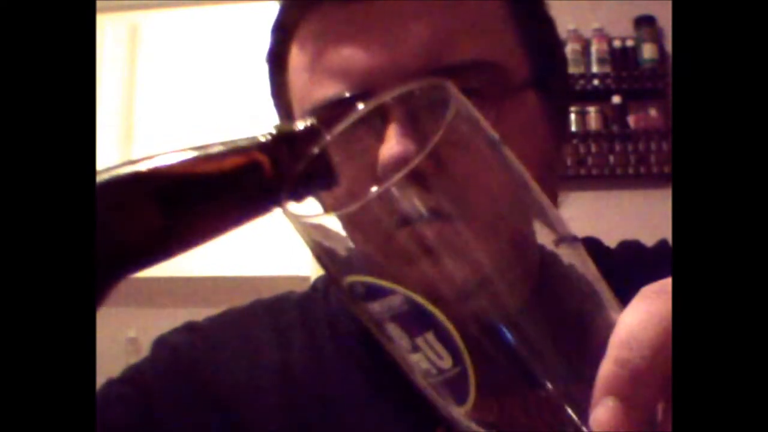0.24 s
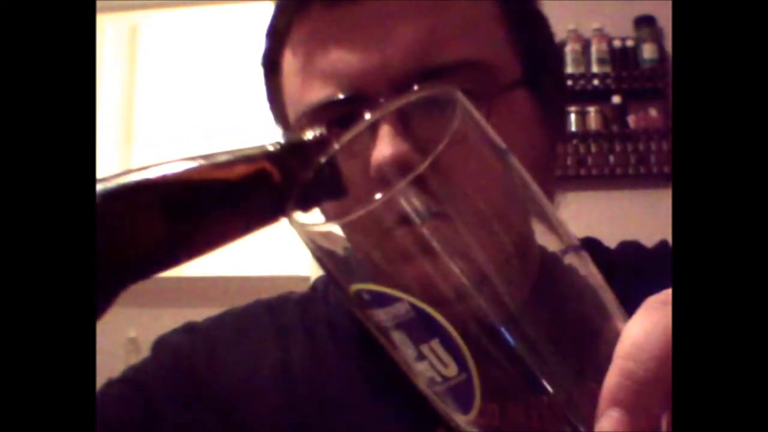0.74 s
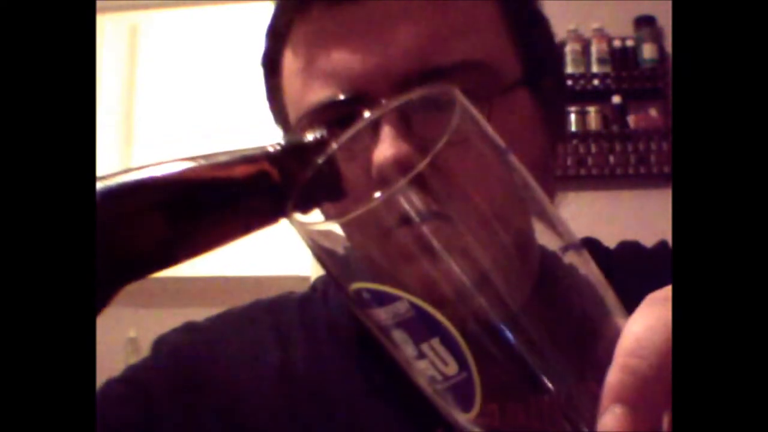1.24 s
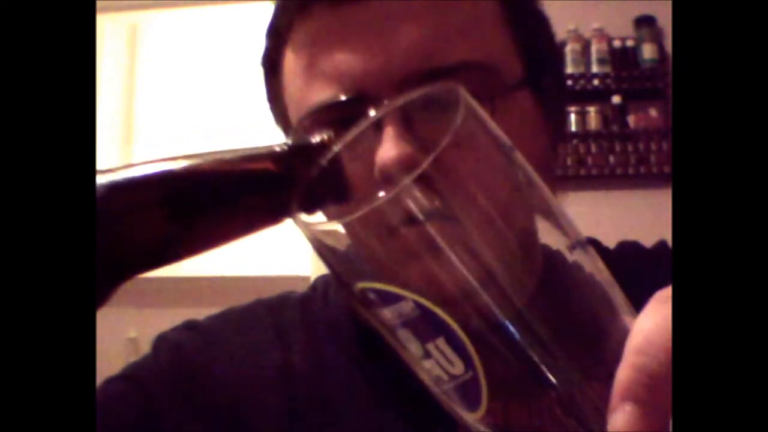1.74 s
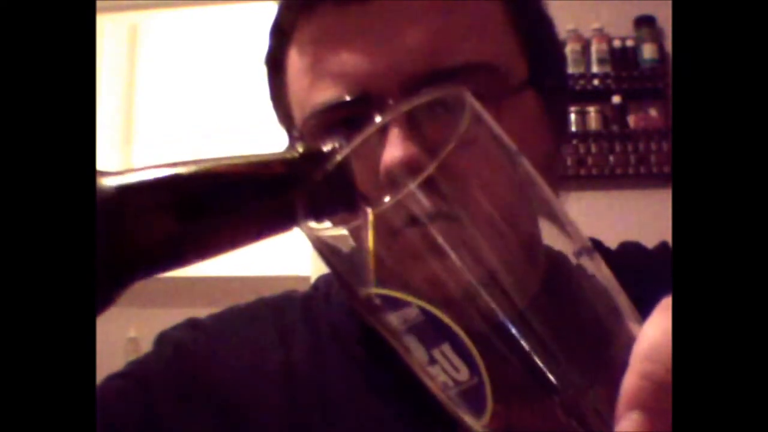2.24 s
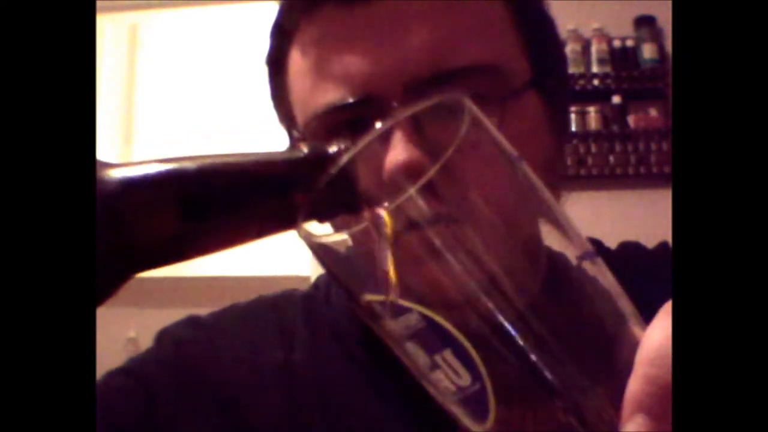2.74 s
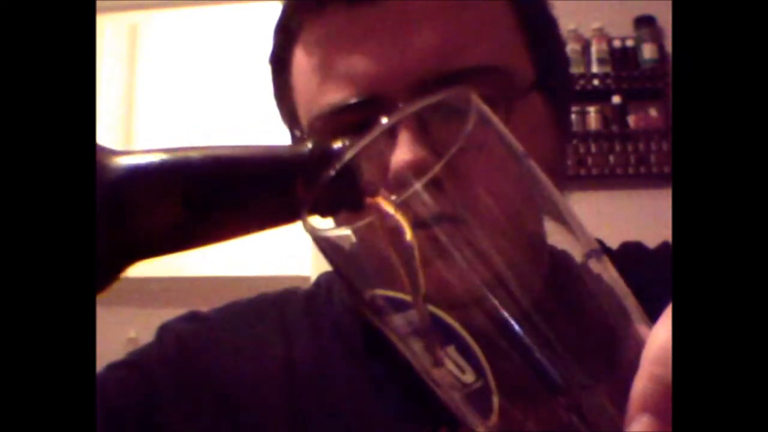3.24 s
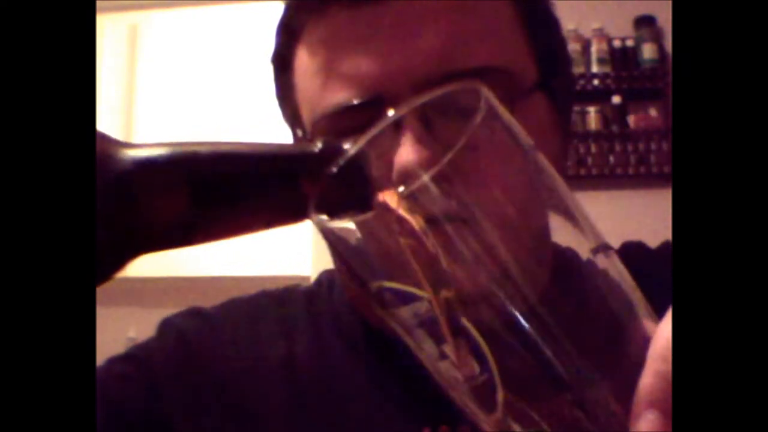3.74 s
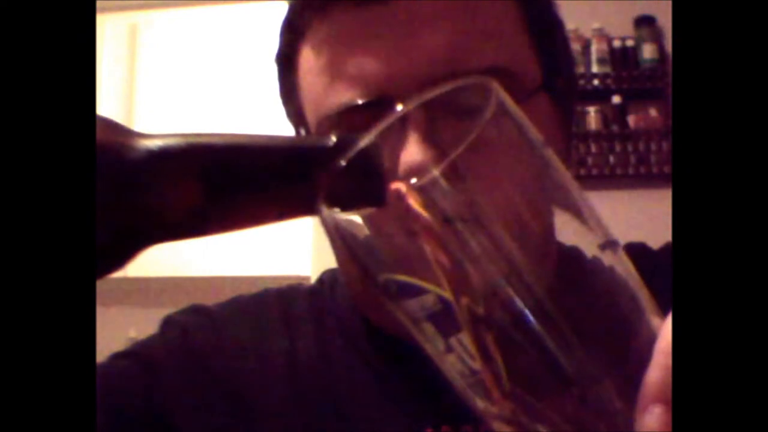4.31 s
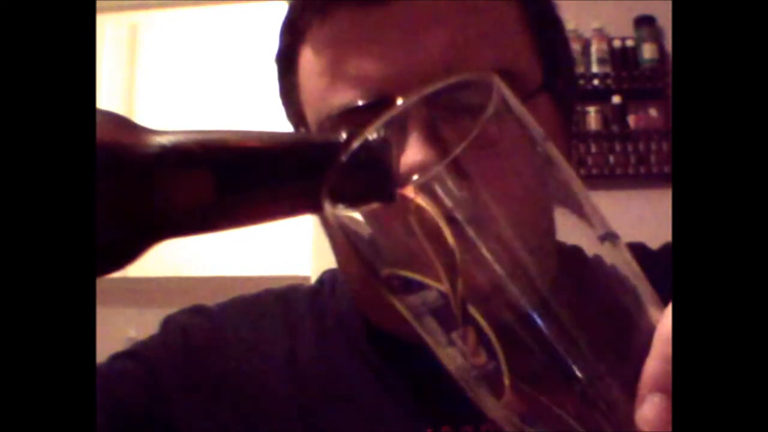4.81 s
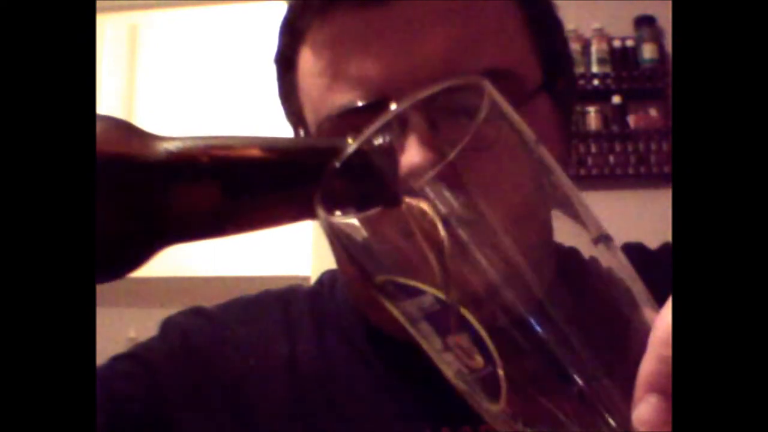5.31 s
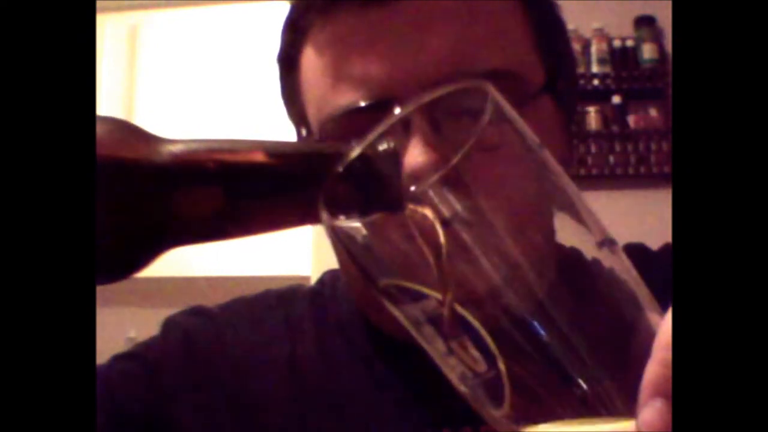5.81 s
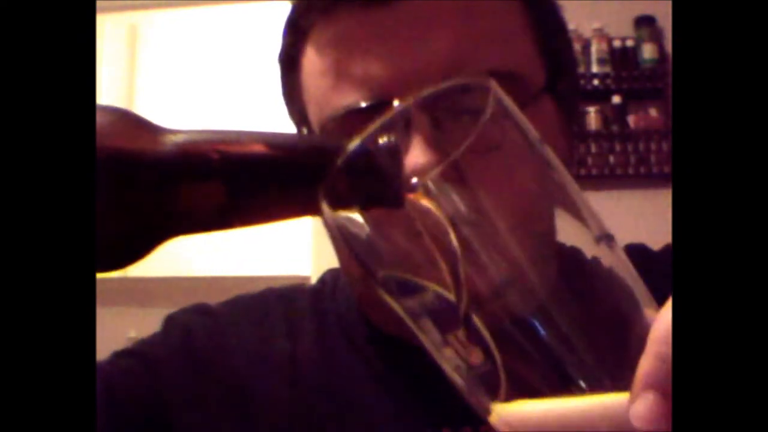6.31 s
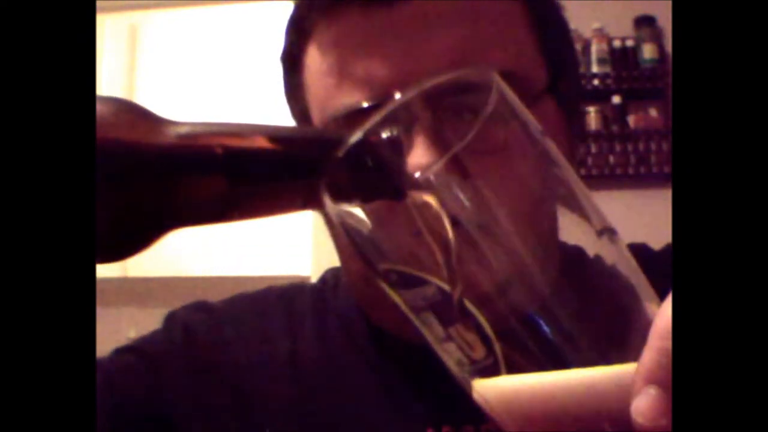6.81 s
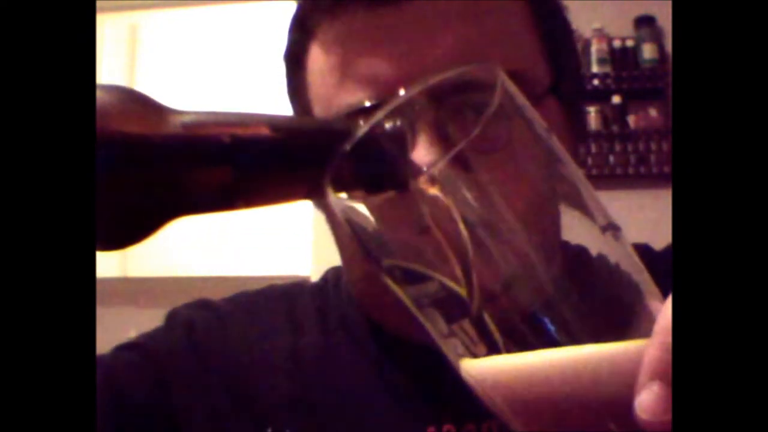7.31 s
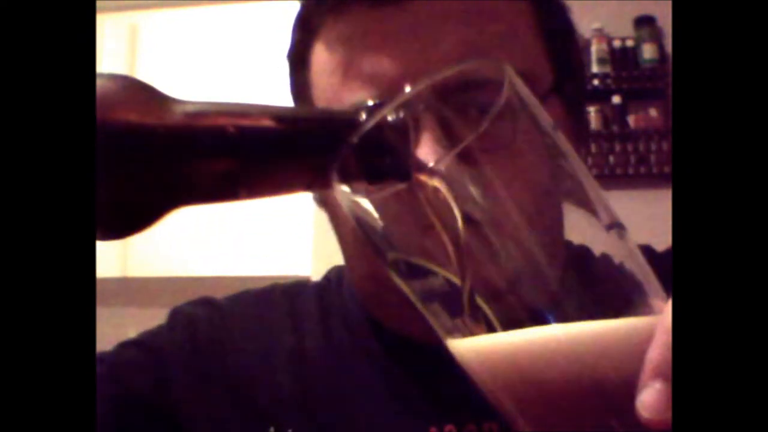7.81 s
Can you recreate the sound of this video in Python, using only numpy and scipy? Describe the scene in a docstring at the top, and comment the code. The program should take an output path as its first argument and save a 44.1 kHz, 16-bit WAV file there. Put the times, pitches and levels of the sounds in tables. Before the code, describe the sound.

Constant broadband hiss, cut off in the high treble, with barely audible thin electronic tones, runs for the whole eight seconds in a small room. The first second is hiss alone. At about 1.1 s a bottle neck chatters lightly and rapidly on a glass rim, with a single clearer clink at 1.45 s and a faint tap at 1.9 s. The loudest clinks come at 2.13 to 2.26 s, a quick bouncing rattle whose bright ring beats and fades over about a second. A soft, dull handling bump swells at 3.2 s. More rattling taps come at 4.1 to 4.4 s and 4.64 to 4.8 s, with a slightly higher hollow glass note. Weak, drier ticks follow from 6.2 to 6.9 s, then only hiss to the end. No pouring is audible.

```python
"""Beer is poured inaudibly into a tilted pint glass, close to a hissy webcam in a small room: filtered noise and thin
tones run throughout. From 1.1 s the bottle neck chatters on the rim, most loudly near 2.13 s; a soft handling bump
swells at 3.2 s; more chatter follows from 4.1 to 4.7 s and from 6.2 to 6.9 s. Each touch knocks, sounds the air in the
glass at a pitch that climbs with the filling, and resets the swing of the glass's modes. In a run the lowest mode
weakens, usually as the next one gains; the modes ring on and beat after the last touch."""
import sys
import numpy as np
from scipy import signal
from scipy.fft import rfft, irfft, next_fast_len
from scipy.io import wavfile

SR = 44100
rng = np.random.default_rng(int(sys.argv[2]) if len(sys.argv) > 2 else 0)


def to_wav(s):
    """Save 16-bit WAV."""
    ch = np.atleast_2d(s).T  # columns
    pcm = np.round(np.clip(ch, -1, 1) * 32767)  # PCM
    wavfile.write(sys.argv[1], SR, pcm.astype(np.int16))


N = 355093
TIME = np.arange(N) / SR  # s

# Spectrum of the microphone hiss. Each row: frequency in Hz, relative density in dB per Hz.
HISS_SPECTRUM = [(15, -21), (25, -3), (33, -8.5), (64, -9), (151, -8.5), (179, -8), (207, -8), (284, -7.5),
                 (749, -7.5), (979, -8), (1670, -9.5), (7000, -9), (7720, -10.5), (8300, -41.5),
                 (10800, -62.5), (18300, -120)]
# Spectrum of the hiss that is opposite in the two channels. Each row: frequency in Hz, relative density in dB per Hz.
SIDE_SPECTRUM = [(3000, -73.5), (4000, -26), (6000, -9.5), (7400, -62.0), (8300, 11.0)]
# Faint hum and electronic whine. Each row: frequency in Hz, rms level in dB.
WHINE_TONES = [(177.6, -67), (1001, -63), (2003, -64.5), (3499, -76.5), (5502, -82.5), (6498, -62.5)]
# The soft handling bump. One row: centre in seconds, standard deviation of the swell in seconds, level in dB.
HANDLING_BUMP = (3.2, 0.044, -45.5)
# Spectrum of the bump. Each row: frequency in Hz, relative density in dB per Hz.
BUMP_SPECTRUM = [(60, -17), (150, 4), (600, -7), (1500, -9), (5000, -33)]
# Resonances as the glass fills. Each row: time in seconds, air column in Hz, its level in dB relative to the knock,
# upper resonance in Hz, its level in dB relative to the knock.
FILLING = [(1.4, 522.5, -11.5, 3580, -15.5), (2.2, 525, -18.5, 3650, -16.5), (4.15, 586, -23, 3735, -20.5),
           (4.72, 619, -22.5, 3860, -22), (6.6, 630, -26.5, 4040, -33)]
# Spectrum of the dense overtones of the glass. Each row: frequency in Hz, relative density in dB per Hz.
SHIMMER_SPECTRUM = [(300, -13.5), (1000, 2.5), (1600, 8), (2300, -13), (3000, -14.5), (3600, 6),
                    (5400, -0.5), (6200, 2), (8000, -21)]
# Spectrum of the dry knock. Each row: frequency in Hz, relative density in dB per Hz.
KNOCK_SPECTRUM = [(100, -38), (400, -36.5), (750, -12), (1050, -7), (1350, 0.5), (1650, -6), (1900, 6.5),
                  (2200, 1), (2700, -13), (4000, -12), (5500, -23), (8000, -27)]
# Lesser modes of glass and bottle. Each row: frequency in Hz, relative level in dB, 60 dB decay time in seconds.
LESSER_MODES = [(1211, -20, .12), (1420, -23, .025), (1860, -24, .1), (1957, -23, .12), (2052, -26, .12),
                (2168, -27, .12), (2617, -29, .1), (2848, -31, .12), (2880, -31, .18), (4545, -28, .1),
                (4683, -25, .22), (4996, -25, .18), (5330, -25, .08), (5388, -24, .12), (6835, -36, .15),
                (7470, -34, .12)]
# The low, middle and high ring, each a close pair of modes. Each row: frequency in Hz, relative level in dB,
# 60 dB decay time in seconds before extra damping, level of the weaker twin in dB relative to the stronger,
# splitting as a share of the beat rate.
RING_PAIRS = [(1109.3, -1.5, 1.15, -19.5, .5), (2520.7, 1, 0.95, -3.5, 1.0), (3349, 1, .22, -31.5, 0.6)]
# Landings of the neck on the rim. Each row: start in seconds, number of touches, first bounce in seconds,
# later bounces in seconds, relative level of the first knock in dB, low ring at first and at last touch in relative dB,
# middle ring at first and at last touch in relative dB, high ring at first touch in relative dB; then, after the
# last touch: beat rate in Hz, wait before the beat in seconds, extra damping in dB per second.
RIM_LANDINGS = [(1.12, 2, 0.021, .011, -19.5, -17, -30.5, -31, -30.5, -30, 10, .02, -5),
                (1.1634, 5, 0.0061, 0.012, -22, -18, -32.5, -32, -21, -29, 8, 0.094, -8),
                (1.451, 1, 0, 0, -14.5, -14.5, -15.5, -20.5, -22.5, -24.5, 10.2, 0, 1.5),
                (1.891, 1, 0, 0, -32, -29, -28, -40.5, -41.5, -53, 11.6, 0, 4.5),
                (2.1288, 2, 0.028, .011, -10, -10, -14, -21.5, -19, -22, 12, 0.054, -3),
                (2.1797, 4, .0106, 0.013, -14, -14.5, -28.5, -15, -18, -25.5, 12, 0.021, -1),
                (2.2426, 2, 0.021, .011, -24.5, -22.5, -29, -17.5, -17.5, -33, 12.37, 0.015, 0.5),
                (4.1097, 4, 0.021, 0.015, -18.5, -18.5, -30, -55, -21, -39.5, 10.7, 0.013, 4),
                (4.2869, 4, 0.013, .0145, -25.5, -23, -50, -41.5, -34, -46, 9.1, 0.25, 33),
                (4.6382, 10, .0226, .012, -14.5, -15, -46.5, -32, -16.5, -30.5, 9.4, 0.037, 16),
                (6.1752, 3, 0.015, 0.015, -22.5, -23, -38.5, -34, -36, -35.5, 17, 0, 189),
                (6.5236, 7, 0.0097, 0.013, -25, -46, -64, -26.5, -29.5, -37, 19, 0.11, 9),
                (6.742, 3, 0.023, 0.0062, -29.5, -47, -52, -34.5, -39.5, -47, 11, 0, 120),
                (6.882, 1, 0, 0, -37, -56, -57, -36, -36.5, -61, 11.6, 0.0084, 13)]


def from_db(db):
    """Principle of the logarithmic level: decibels become an amplitude ratio."""
    return 10 ** (np.asarray(db) / 20)


def rms_one(x):
    """Normalisation by mean power: the signal is scaled to unit rms."""
    return x / np.sqrt(np.mean(x ** 2) + 1e-20)


def read(table, seconds):
    """Linear interpolation: the columns of a table at the given moments."""
    times, *columns = np.transpose(table)
    return [np.interp(seconds, times, column) for column in columns]


def gain_curve(spectrum, size):
    """Spectral envelope: levels joined along log frequency, as gains on an FFT grid."""
    hz, db = np.transpose(spectrum)
    grid_hz = np.fft.rfftfreq(size, 1 / SR) + 1  # one hertz added keeps the logarithm finite
    return from_db(np.interp(np.log(grid_hz), np.log(hz), db))


def noise(spectrum):
    """Spectral shaping: white noise filtered to the given colour, at unit rms."""
    size = next_fast_len(N, True)
    white = rfft(rng.standard_normal(size))
    return rms_one(irfft(white * gain_curve(spectrum, size), size)[:N])


def snap(spectrum, size=2048):
    """Minimum phase: folding the cepstrum gives a causal pulse with its energy earliest, at unit peak."""
    cepstrum = irfft(np.log(gain_curve(spectrum, size)))
    cepstrum[1:size // 2] *= 2
    cepstrum[size // 2 + 1:] = 0
    pulse = irfft(np.exp(rfft(cepstrum)))
    return pulse / np.abs(pulse).max()


def clicks(seconds, heights):
    """Impulsive excitation: one impulse at each moment."""
    return np.bincount(np.round(seconds * SR).astype(int), heights, N)


def ring(drive, hz, t60):
    """Damped harmonic oscillator: a unit click starts a decaying sine whose initial envelope is 1."""
    radius = from_db(-60 / (t60 * SR))
    angle = 2 * np.pi * hz / SR
    feedback = [1, -2 * radius * np.cos(angle), radius * radius]
    return signal.lfilter([0, np.sin(angle)], feedback, drive + 1e-18)


def electronics(hiss_db=-42.5, side_db=-15):
    """Stationary noise and steady tones: hiss common to both channels, joined near the top by an opposed part."""
    whine = np.zeros(N)
    for hz, db in WHINE_TONES:
        whine += np.sqrt(2) * from_db(db) * np.sin(2 * np.pi * (hz * TIME + rng.random()))
    common = noise(HISS_SPECTRUM)
    side = from_db(side_db) * noise(SIDE_SPECTRUM)
    return whine + from_db(hiss_db) * (common + side * [[1], [-1]])


def bump():
    """Amplitude modulation: a Gaussian swell shapes dull, low noise."""
    centre, width, db = HANDLING_BUMP
    swell = np.exp(-0.5 * ((TIME - centre) / width) ** 2)
    return from_db(db) * swell * noise(BUMP_SPECTRUM)


def room(x, t60=0.33, first_echo_s=0.0013):
    """Diffuse reverberation: convolution with decaying noise of unit energy, as from nearby walls."""
    age = TIME[:SR // 2]
    tail = rng.standard_normal(len(age)) * from_db(-60 * age / t60) * (age > first_echo_s)
    return signal.oaconvolve(x, tail / np.linalg.norm(tail))[:N]


def chatter():
    """Repeated impact: each landing is one first bounce and a run of nearly even ones with changing mode levels."""
    knock_loss_db, high_loss_db = 1.3, 2  # lost at every bounce
    settle_db = 3  # further knock loss by the end of a run, as the neck settles
    low_hold, middle_rise = 2.16, 4.4  # exponents: low ring holds then drops, middle changes early then levels off
    # chance spread of knock, timing and ring levels, between the first and last touch of a run
    uneven_db, uneven_s, ring_spread_db = 2.5, 0.0003, 2
    # Each row: time in seconds, knock, low, middle and high ring in relative dB, beat rate in Hz,
    # wait in seconds, extra damping in dB per second.
    rows = []
    for (start, count, first_s, later_s, knock, low_first, low_last,
         middle_first, middle_last, high, *ring_on) in RIM_LANDINGS:
        last = count - 1
        for k in range(count):
            progress = k / max(last, 1)
            late, hard, *ring_chance = rng.standard_normal(5) * (0 < k < last)
            bounce_s = first_s + (k - 1) * later_s if k > 0 else 0
            s = start + bounce_s + uneven_s * late
            knock_db = knock - knock_loss_db * k - settle_db * progress ** 2 + uneven_db * hard
            low_db = low_first + (low_last - low_first) * progress ** low_hold
            middle_db = middle_last + (middle_first - middle_last) * (1 - progress) ** middle_rise
            high_db = high - high_loss_db * k
            rings_db = np.array([low_db, middle_db, high_db]) + ring_spread_db * np.array(ring_chance)
            after = ring_on if k == last else (0, 0, 0)
            rows.append((s, knock_db, *rings_db, *after))
    return np.array(sorted(rows))


def air_note(touches, air_t60=0.19, upper_t60=0.12):
    """Cavity resonance: the air gives a short hollow note; it and an upper resonance climb as the beer rises."""
    out = np.zeros(N)
    age = TIME[:SR // 3]
    for s, level_db, *_ in touches:
        air_hz, air_db, upper_hz, upper_db = read(FILLING, s)
        start = round(s * SR)
        for hz, db, t60 in (air_hz, air_db, air_t60), (upper_hz, upper_db, upper_t60):
            envelope = from_db(level_db + db - 60 * age / t60)
            out[start:start + len(age)] += envelope * np.sin(2 * np.pi * hz * age)
    return out


def shimmer(touches, shimmer_db=-20.5, t60=0.2):
    """High modal density: overtones too close to tell apart add in energy as a short wash of noise."""
    s, level_db = touches.T[:2]
    energy_keep = from_db(-60 / (t60 * SR)) ** 2
    struck = clicks(s, from_db(level_db) ** 2) + 1e-18
    energy = signal.lfilter([1], [1, -energy_keep], struck)
    return from_db(shimmer_db) * np.sqrt(energy) * noise(SHIMMER_SPECTRUM)


def knocks(touches, knock_db=1.5, modes_db=0.84, scatter_db=4.0):
    """Impact excitation: each touch gives a dry tick and strikes the lesser modes a little differently."""
    s, level_db = touches.T[:2]
    out = signal.oaconvolve(clicks(s, from_db(level_db + knock_db)), snap(KNOCK_SPECTRUM))[:N]
    chance = rng.standard_normal((len(s), len(LESSER_MODES))).T
    for (hz, db, t60), luck in zip(LESSER_MODES, chance):
        heights = from_db(level_db + db + modes_db + scatter_db * luck)
        out += ring(clicks(s, heights), hz, t60)
    return out


def glass_rings(touches, jolt_rad=0.89, contact_s=0.00091):
    """Split modes: each touch resets a pair's swing and jolts its phase; the pair then decays, and may beat."""
    s, _, *levels = touches.T[:-3]
    last = np.maximum(np.searchsorted(s, TIME, side="right") - 1, 0)  # latest touch at each sample
    age = np.maximum(TIME - s[last], 0)
    beat_hz, wait, damping = touches.T[-3:, last]
    beats = beat_hz * np.maximum(age - wait, 0)  # the pair drifts apart once the neck lets go
    phases = np.cumsum(rng.normal(0, jolt_rad, (len(s), len(RING_PAIRS))), axis=0).T
    keep = np.exp(-1 / (contact_s * SR))  # the contact time smooths a change of swing
    out = np.zeros(N)
    for (hz, db, t60, twin_db, split), level_db, phase in zip(RING_PAIRS, levels, phases):
        twin = from_db(twin_db)
        pair = (1 + twin * np.exp(-2j * np.pi * split * beats)) / (1 + twin)
        height = from_db(db + level_db[last] - (60 / t60 + damping) * age) * (TIME >= s[0])
        target = height * pair * np.exp(1j * phase[last])
        swing = signal.lfilter([1 - keep], [1, -keep], target)
        out += np.real(swing * np.exp(2j * np.pi * hz * TIME))
    return out


def scene(highpass_hz=300, room_db=-7.5):
    """Superposition: clinks at the centre, over the bump and the hiss."""
    touches = chatter()
    taps = knocks(touches) + air_note(touches)
    clinks = glass_rings(touches) + shimmer(touches) + taps + from_db(room_db) * room(taps)
    # a highpass keeps the clinks free of low thuds
    highpass = signal.butter(2, highpass_hz, "high", fs=SR, output="sos")
    return signal.sosfilt(highpass, clinks) + bump() + electronics()


def record(dry, cutoff_hz=8300, offset=-0.0147):
    """Band limitation: the webcam cuts the treble steeply and adds a small constant offset."""
    lowpass = signal.ellip(12, 0.1, 70, cutoff_hz, fs=SR, output="sos")
    return signal.sosfilt(lowpass, dry) + offset


dry = scene()
out = record(dry)
to_wav(out)
```